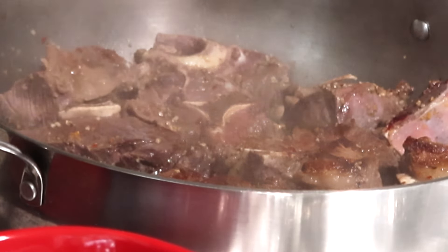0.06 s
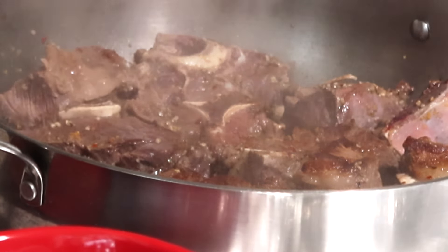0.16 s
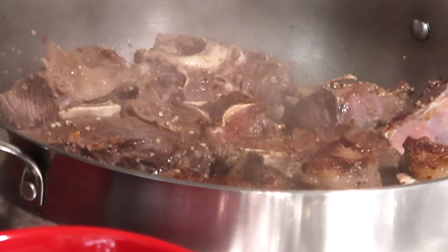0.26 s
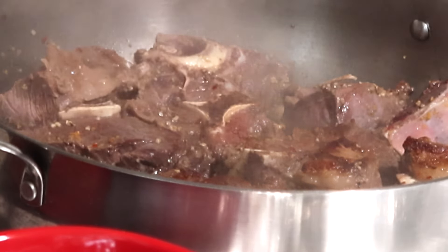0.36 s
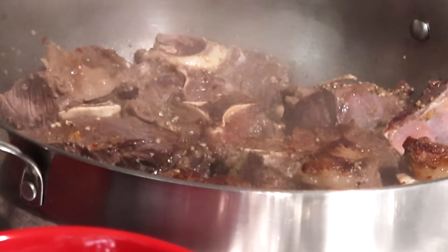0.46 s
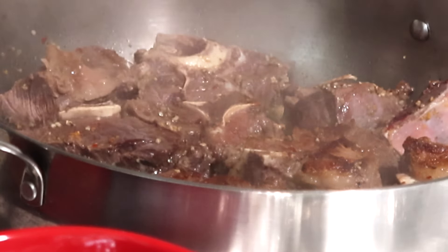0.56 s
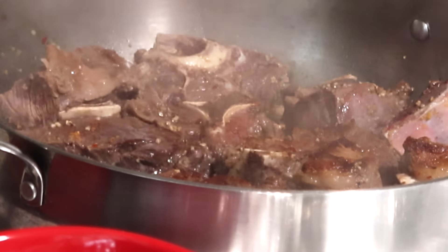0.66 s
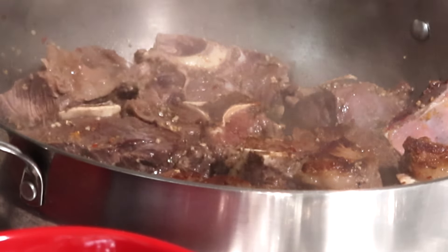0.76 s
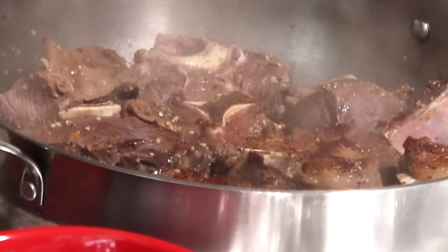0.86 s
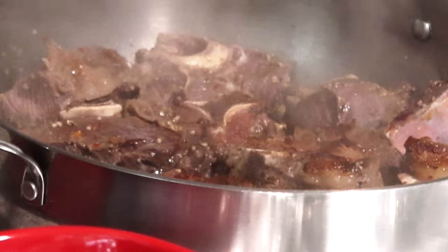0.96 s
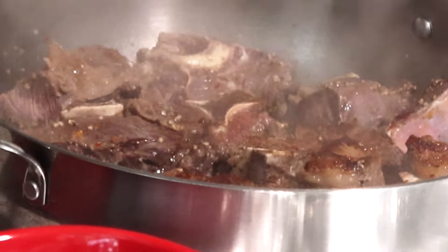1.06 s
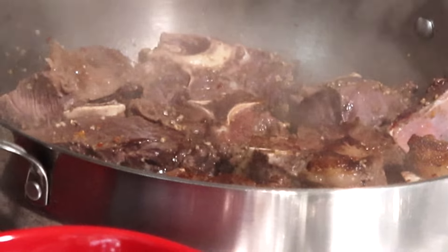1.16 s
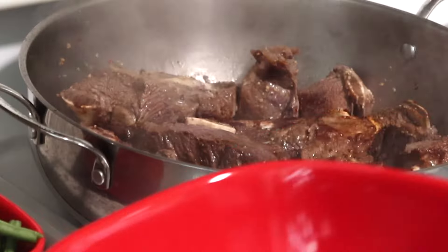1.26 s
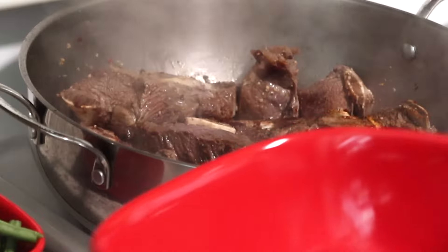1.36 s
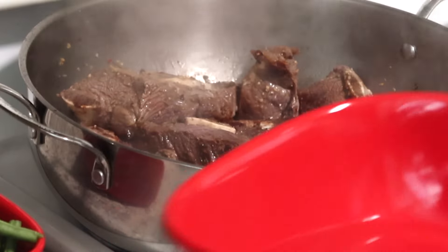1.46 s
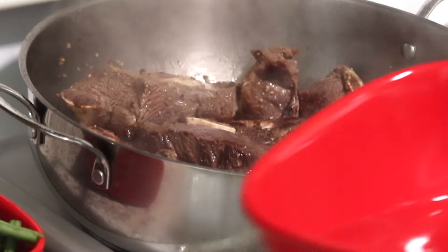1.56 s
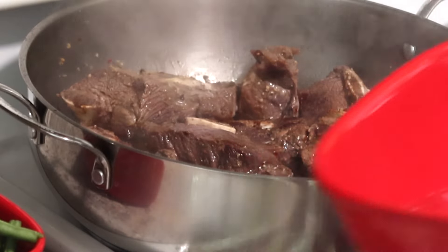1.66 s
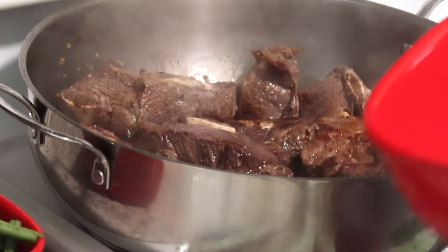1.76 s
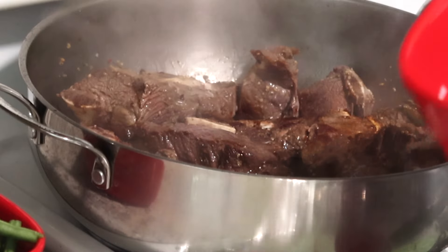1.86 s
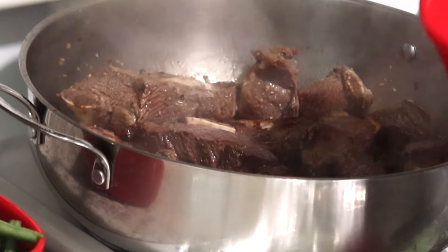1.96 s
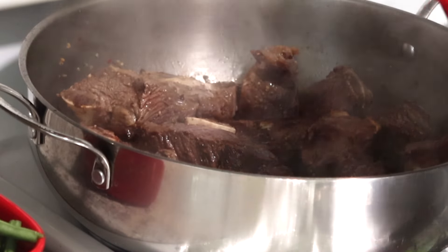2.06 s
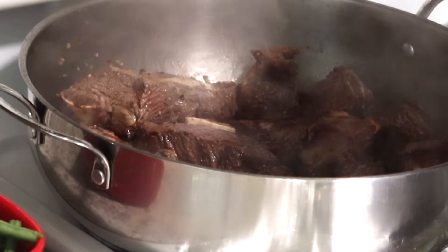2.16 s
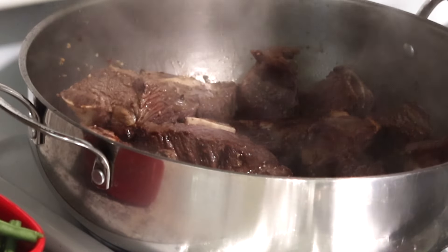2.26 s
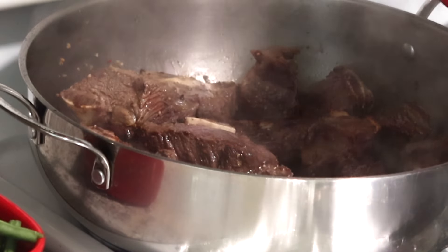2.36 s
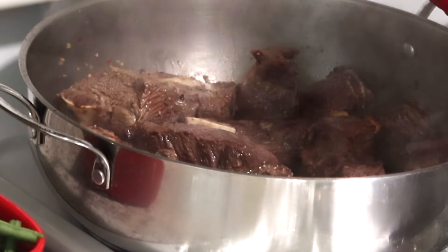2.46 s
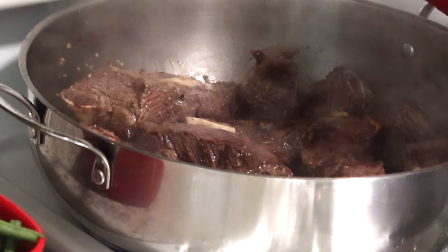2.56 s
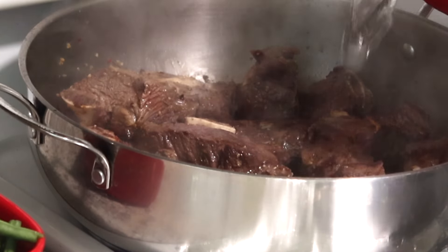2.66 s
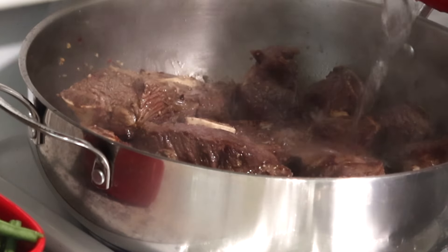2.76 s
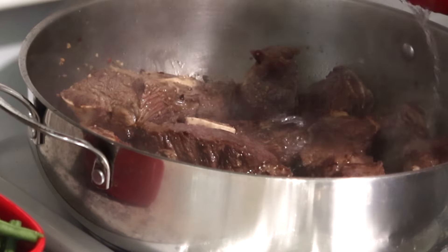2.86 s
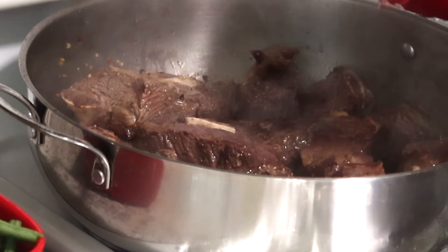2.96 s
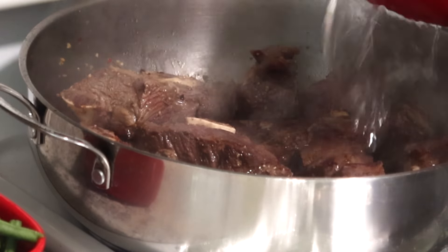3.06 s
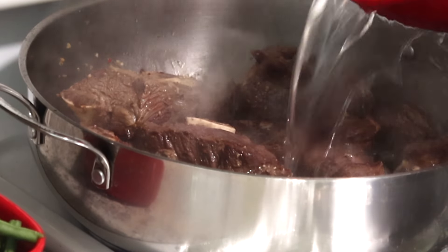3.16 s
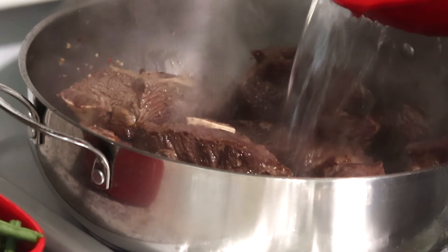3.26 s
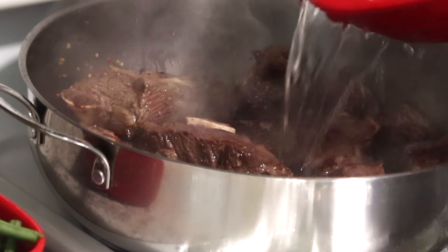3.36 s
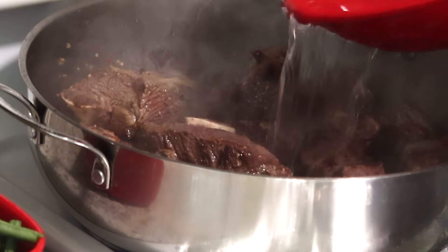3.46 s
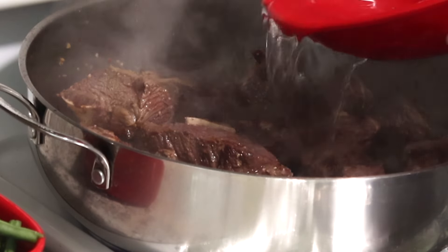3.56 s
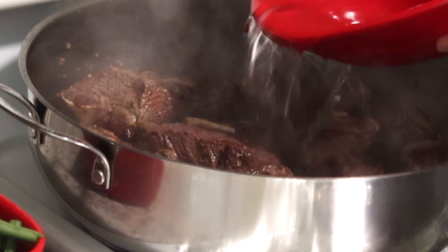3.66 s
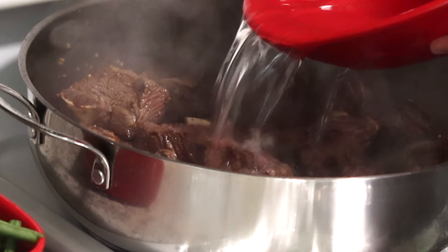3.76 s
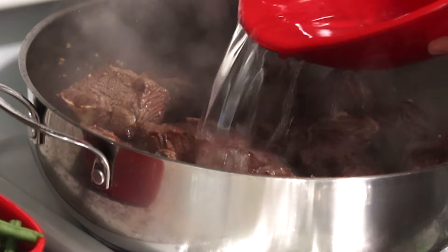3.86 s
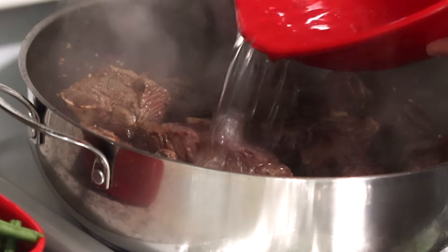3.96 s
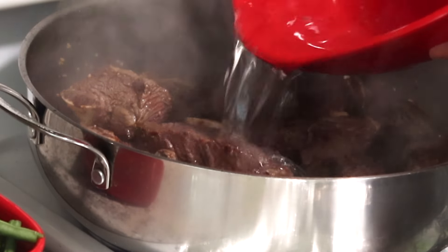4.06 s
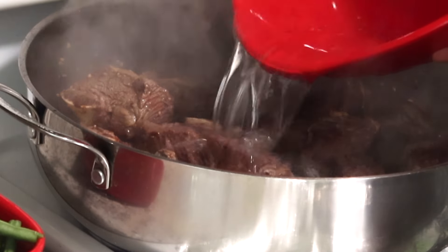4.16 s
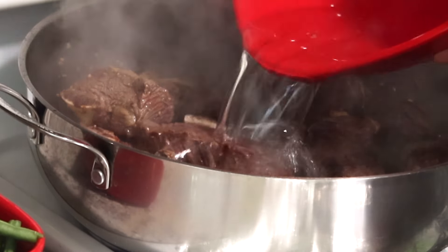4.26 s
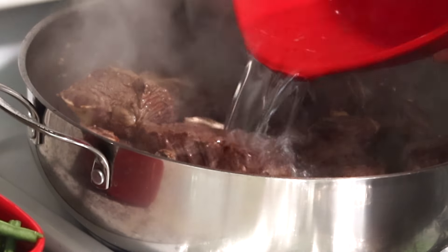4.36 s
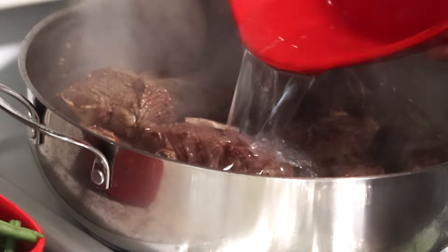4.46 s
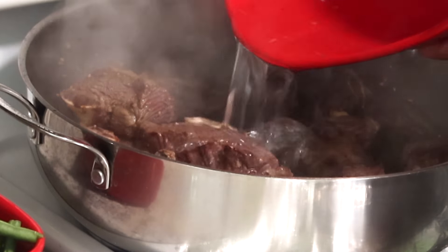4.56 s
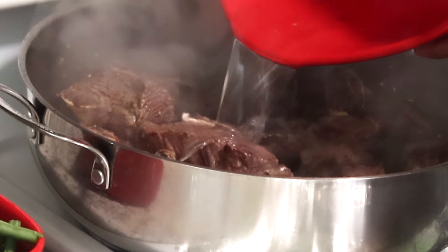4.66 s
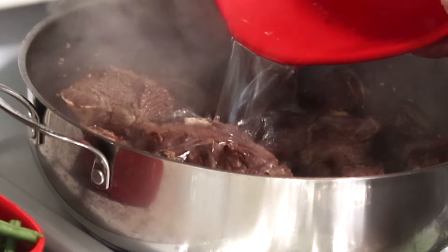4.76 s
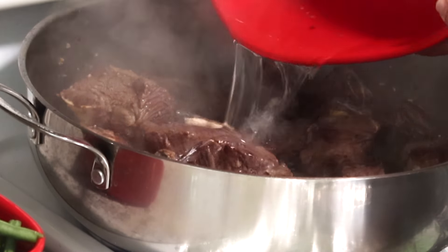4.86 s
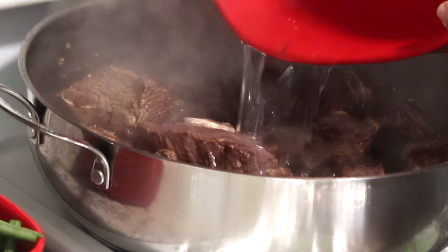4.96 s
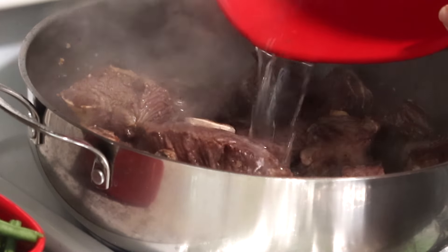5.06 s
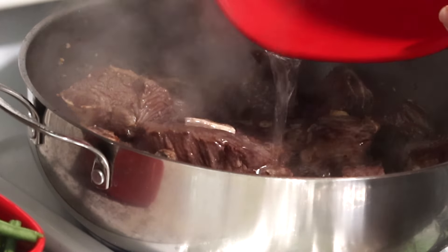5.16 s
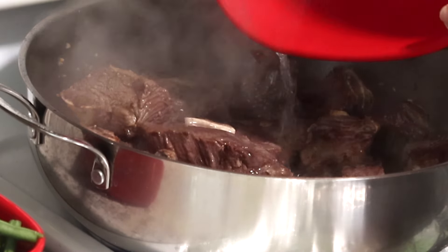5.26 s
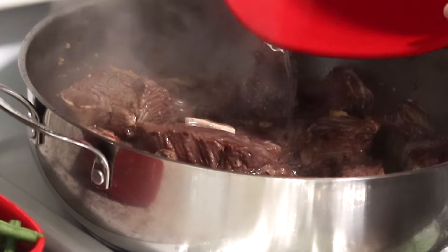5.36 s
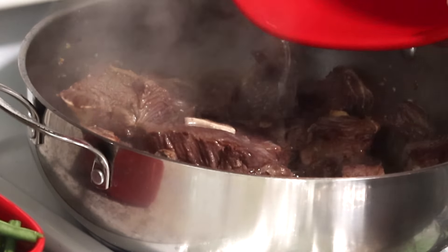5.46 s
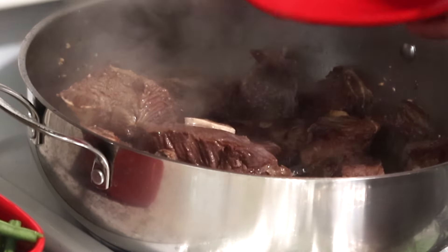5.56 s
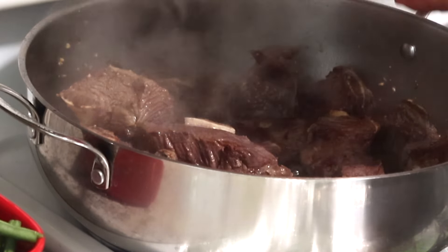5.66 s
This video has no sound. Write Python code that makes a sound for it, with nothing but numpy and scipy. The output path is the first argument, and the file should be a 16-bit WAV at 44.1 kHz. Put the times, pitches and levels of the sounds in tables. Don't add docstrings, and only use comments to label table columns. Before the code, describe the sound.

Close in a small kitchen, meat sizzles in a wide steel pan: a dense, fine crackle, gradually brightening, over the low hum and air rumble of an extractor fan. Soft low spits pop at about 0.3 and 0.8 s; from 0.9 s dull low bumps suggest the microphone being moved. At 1.17 s the sound drops out for under a tenth of a second, then returns abruptly with a louder, brighter fizz. From about 2.8 s water is poured in; steam hiss surges in the midrange, with a sharp loud spit at 3.5 s, growing to a rushing peak near 4.4 s. Gurgling builds beneath it as the pan fills, with a big plop around 4.6 s. After 4.8 s the fizz is quenched and dulls, the hiss falls away, and darker bubbling and small plops continue to the end, about 5.7 s. Faint metallic pan ring, short room tail, almost mono.

```python
import sys
import numpy as np
from scipy import signal
from scipy.io import wavfile
from scipy.ndimage import uniform_filter1d

SR = 44100
rng = np.random.default_rng(int(sys.argv[2]) if len(sys.argv) > 2 else 0)


def invert_db(level):
    return 10 ** (np.asarray(level, dtype=float) / 20)


def pcm_store(signal):
    levels = np.round(np.clip(np.atleast_2d(signal), -1, 1) * 32767)
    wavfile.write(sys.argv[1], SR, levels.astype(np.int16).T)


N = 251678
DROP_S, BACK_S = 1.1717, 1.2485


def unit(x):
    return x / np.sqrt(np.mean(x ** 2) + 1e-20)


def in_time(rows):
    s, *columns = np.transpose(rows)
    return [np.interp(np.arange(N) / SR, s, c) for c in columns]


def swell(t, s, length):
    return np.exp(-.5 * ((t - s) / length) ** 2)


def drift(rate):
    r = np.exp(-80 * np.pi * rate / SR)
    noise = rng.standard_normal(N // 40 + 2002)
    slow = signal.lfilter([1], [1, -2 * r, r * r], noise)[2000:]
    return np.interp(np.arange(N) / 40, np.arange(len(slow)), unit(slow))


def resonance(x, hz, width_hz):
    r = np.exp(-np.pi * width_hz / SR)
    poles = [1, -2 * r * np.cos(2 * np.pi * hz / SR), r * r]
    return signal.lfilter([(1 - r * r) / 2, 0, (r * r - 1) / 2], poles, x)


def bursts(colour, per_s, spread_db, surge_db, patch_db, tilt_db=0):
    hz, level_db = np.transpose(colour)
    edges = 2 ** np.arange(np.log2(hz[0]), np.log2(hz[-1]) + 1 / 5, 1 / 4)
    sizes = invert_db(spread_db * np.minimum(rng.exponential(1, N), 5)) * rng.choice([-1, 1], N)
    chance, surge = rng.random((3, N)), drift(14.6)
    out, power = 0, 0
    for k, (low, high) in enumerate(zip(edges, np.minimum(edges[1:], .45 * SR))):
        struck = np.roll(chance[k % 3], 1499 * k) < per_s / SR
        clicks = unit(np.roll(sizes, 997 * k) * struck)
        band = signal.butter(2, [low, high], "band", fs=SR, output="sos")
        rings = signal.sosfilt(band, clicks + 1e-18)
        centre = np.sqrt(low * high)
        gain_db = np.interp(np.log(centre), np.log(hz), level_db)
        power += invert_db(2 * gain_db) * np.mean(rings ** 2)
        slope_db = tilt_db * np.log2(centre / hz[np.argmax(level_db)])
        out = out + invert_db(gain_db + slope_db + surge_db * surge + patch_db * drift(11)) * rings
    return out / np.sqrt(power)


# (fizz level [dB], fizz tilt [dB/octave], flash level [dB], gurgle level [dB])
SIMMER = [
    (-30, -1, -30, -38),
    (-23.5, -0.7, -29.5, -40.5),
]


def simmer():
    early = np.arange(N) / SR < BACK_S
    return [np.where(early, before, after) for before, after in zip(*SIMMER)]


# (time [s], level [dB])
VIGOUR = [(0, -2.5), (.2, -1.5), (.4, 0.6), (.75, -0.4), (1.17, -1.5)]


def vigour():
    return (np.arange(N) / SR < BACK_S) * in_time(VIGOUR)[0]


# (time [s], level [dB])
POUR = [(1.4, 0), (2.75, 1.4), (3.0, 4.5), (3.45, 8), (3.8, 8.5), (4.35, 10.5), (4.7, 8.5), (5.05, 3),
        (5.7, -2)]


def pour():
    return (np.arange(N) / SR >= BACK_S) * in_time(POUR)[0]


def pool():
    from_s, full_s = 2.78, 4.5
    t = np.arange(N) / SR
    return np.clip((t - from_s) / (full_s - from_s), 0, 1), np.maximum(t - full_s, 0)


# (time [s], steam level [dB], gurgle level [dB], length [s])
SURGES = [(.33, .6, 3.5, 0.025), (2.99, 0.5, -1.5, 0.055), (3.045, -.6, 3.5, 0.039),
          (3.327, 0.5, -0.5, 0.027), (3.527, 2.5, 0, 0.027), (3.9, 1, 0, 0.11), (4.18, 1.3, 0.5, 0.062),
          (3.7, 0.8, 2, 0.1), (4.38, 1.5, -1, 0.05), (4.95, 1, 3, 0.066), (5.077, 0, -2, 0.04),
          (5.38, 2, 2.5, 0.026), (5.478, -9, 0.5, 0.026)]


def surges():
    t = np.arange(N) / SR
    steam_db = sum(db * swell(t, s, length) for s, db, _, length in SURGES)
    gurgle_db = sum(db * swell(t, s, length) for s, _, db, length in SURGES)
    return steam_db, gurgle_db


# (frequency [Hz], spectral density [dB])
FIZZ = [(700, -16.5), (1500, -13), (2800, -8.5), (4200, -1.5), (6500, -2.5), (9000, -5.5), (12000, -12.5),
        (15800, -20)]
# (time [s], level [dB], length [s])
FLARES = [(2.45, 0.5, 0.043), (3.152, 2, 0.071), (3.55, 1.5, 0.033), (3.657, -0.5, 0.053), (4.152, 1, .05),
          (4.637, 1.5, 0.044), (5.05, 3.5, .02), (5.098, -2, .02), (5.16, 1, .015), (5.234, -7, 0.011),
          (5.262, 1.5, 0.0175), (5.375, -1, .01), (5.455, 0, 0.011), (5.5, 0.5, 0.032),
          (5.567, -11, 0.0087), (5.595, 4, 0.016)]


def fizz():
    t = np.arange(N) / SR
    level_db, tilt, _, _ = simmer()
    pour_db = pour()
    drown_from_s, drown_time_constant_s = 4.794, 0.79
    drowned = 1 - np.exp(-np.maximum(t - drown_from_s, 0) / drown_time_constant_s)
    flare_db = sum(db * swell(t, s, length) for s, db, length in FLARES)
    level_db = level_db + vigour() + 0.25 * pour_db - 14 * drowned
    brightening = 0.82 * t * (t < BACK_S)
    tilt = tilt + brightening - 0.08 * pour_db - 8.5 * drowned
    return invert_db(level_db + 0.9 + 0.68 * flare_db) * bursts(FIZZ, 11000, 2.2, 0.56, 0.31, tilt + 0.22 * flare_db)


# (frequency [Hz], spectral density [dB])
FLASH = [(500, -20), (900, -12), (1300, -7), (1650, 0.5), (2150, 3), (2600, 0.5), (3200, -1), (5000, -8.5),
         (8000, -13.5)]


def flash():
    _, _, level_db, _ = simmer()
    level_db = level_db + 0.72 * vigour() + pour() + surges()[0]
    return invert_db(level_db - 0.5) * bursts(FLASH, 4000, 2.32, 0.067, 0.96)


# (frequency [Hz], spectral density [dB])
GURGLE = [(200, -10.5), (330, -4), (480, 0.5), (750, 3), (1000, 3), (1300, 3), (1800, -8), (3000, -16)]


def gurgle():
    _, _, _, level_db = simmer()
    depth, flooded_s = pool()
    level_db = level_db + 0.97 * vigour() + 13.5 * depth - 4 * flooded_s + surges()[1]
    tilt = -.3 - 4 * flooded_s
    return invert_db(level_db - 1.5) * bursts(GURGLE, 900, 2.2, 0.29, 0.17, tilt)


# (frequency [Hz], width [Hz], added level [dB])
BODY = [(367, 7.5, -16), (492, 40, 3), (634, 16, -0.5), (702, 46, -2), (796, 44, -4.5), (909, 29, -3.5),
        (1004, 58, -12), (1240, 170, -8.5), (1360, 28, -0.5), (1555, 110, -5), (2020, 48, -15),
        (2200, 105, -14.5), (2934, 68, -10), (3470, 99, -18), (4030, 280, -15.5), (6000, 52, -34.5)]


def steel(x):
    return invert_db(-1.5) * (x + sum(invert_db(db) * resonance(x, hz, width) for hz, width, db in BODY))


# (frequency [Hz], spectral density [dB])
RUMBLE = [(25, -9), (40, -3.5), (60, -18.5), (80, -0.5), (110, -2), (150, -4), (220, -10), (320, -10),
          (450, -13), (800, -29)]
# (frequency [Hz], early level [dB], late level [dB])
MOTOR = [(59, -56, -49.5), (119.7, -44.5, -45), (175, -69, -60), (303.3, -53.5, -58.5)]


def fan():
    t = np.arange(N) / SR
    turn, tones = 2 * np.pi * t + .003 * drift(3), 0
    for hz, early_db, late_db in MOTOR:
        level_db = np.where(t < BACK_S, early_db, late_db) + 3 + 1.1 * drift(9)
        tones = tones + invert_db(level_db) * np.sin(hz * turn)
    air = bursts(RUMBLE, 9000, 1.0, 0.25, 0.23)
    air_db = -40.5 + 2 * pool()[0] - 2.5
    return invert_db(air_db) * (air + invert_db(-6.0) * resonance(air, 99, 12.4)) + tones


def kitchen(x):
    t60_s = 0.24
    t = np.arange(round(.4 * SR)) / SR
    echoes = rng.standard_normal(len(t)) * invert_db(-60 * t / t60_s) * (t > .004)
    echoes = signal.lfilter([1], [1, -.3], echoes)
    return signal.fftconvolve(x, echoes / np.sqrt(np.sum(echoes ** 2)))[:N]


# (time [s], peak level [dB], pitch [Hz])
SPITS = [
    (0.2126, -18, 2020),
    (0.329, -14, 990),
    (0.782, -19, 1700),
    (0.803, -18, 960),
    (3.523, -6, 2300),
    (3.538, -15, 2300),
    (4.952, -23, 900),
    (4.982, -18, 1200),
    (5.379, -15, 1000),
]


def spits():
    out, t = np.zeros(N), np.arange(round(.15 * SR)) / SR
    sprays = rng.standard_normal((len(SPITS), len(t)))
    for (s, peak_db, hz), spray in zip(SPITS, sprays):
        puff = invert_db(-30) * spray * np.exp(-t / 0.027)
        puff[0] += 1
        ring = resonance(resonance(puff, hz, 1.1 * hz), hz, 3.4 * hz)
        at = round(s * SR)
        out[at:at + len(t)] += invert_db(peak_db + 23.0) * ring
    return out


def handling():
    from_s, rise_s, level_db = .86, .06, -42
    t = np.arange(N) / SR
    band = signal.butter(2, [40, 130], "band", fs=SR, output="sos")
    thud = signal.sosfilt(band, rng.standard_normal(N))
    return invert_db(level_db) * np.clip((t - from_s) / rise_s, 0, 1) * (t < BACK_S) * unit(thud)


# (time [s], peak level [dB], pitch [Hz], life [s])
PLOPS = [(4.565, -11, 1152, 0.018), (4.74, -15, 613, 0.0079), (4.948, -19, 510, 0.013),
         (4.978, -30, 680, 0.011), (5.268, -24, 690, 0.011), (5.278, -25, 504, 0.016),
         (5.315, -25, 435, 0.013), (5.372, -21, 772, 0.01), (5.45, -19, 592, 0.011),
         (5.538, -20.5, 490, 0.013), (5.62, -19, 573, 0.022)]


def plops():
    out, t = np.zeros(N + SR), np.arange(round(.08 * SR)) / SR
    for s, peak_db, hz, life in PLOPS:
        shape = t / life * np.exp(1 - t / life * 2.5)
        at = round(s * SR)
        out[at:at + len(t)] += invert_db(peak_db - 1.5) * shape * np.sin(2 * np.pi * hz * t * (1 + 1.15 * t))
    return out[:N]


def scene():
    pan = steel(fizz() + flash() + gurgle() + spits() + plops())
    return np.tile(pan + invert_db(-14) * kitchen(pan) + fan() + handling(), (2, 1))


# (time [s], low edge [Hz], high edge [Hz])
FILLS = [(0.118, 4620, 5770), (0.258, 6240, 8350), (0.258, 8870, 10340), (0.304, 7620, 9100),
         (0.351, 8230, 9690), (0.722, 4610, 5770), (0.722, 7540, 8960), (0.885, 5130, 6370),
         (0.908, 5170, 7600), (0.954, 5700, 6980), (1.512, 8910, 10420), (2.046, 10940, 12490),
         (2.069, 8350, 10420), (2.092, 6300, 7670), (2.139, 4610, 5730), (2.255, 5160, 6300),
         (2.44, 4640, 5600), (2.649, 5210, 6300), (2.905, 10900, 12400), (2.928, 5170, 6980),
         (3.021, 4610, 6290), (3.021, 7580, 9000), (3.625, 4260, 6800), (4.019, 8200, 10420),
         (4.112, 4240, 5150), (4.112, 8230, 9730), (4.205, 8300, 9690), (4.878, 8910, 10380),
         (4.971, 4220, 5200), (5.064, 4650, 5700)]


def fill_bands(mid):
    top_hz, offset = 15750, 100
    n, side, mid = np.arange(2048), np.zeros(N), mid.copy()
    bell = np.sin(np.pi * (n + .5) / len(n))
    # time [s], low edge [Hz], width [Hz]
    stray = rng.uniform((.1, 10300, 1400), (4.5, 14400, 2600), size=(10, 3))
    fills = FILLS + [(s, low, min(low + width, top_hz)) for s, low, width in stray if abs(s - BACK_S) > .1]
    for (s, low, high), noise in zip(fills, rng.standard_normal((len(fills), 1024))):
        at = offset + 1024 * round((s * SR - offset) / 1024 - 1) + n
        k = np.arange(round(low / SR * 2048), round(high / SR * 2048))
        waves = bell * np.cos(np.pi / 1024 * np.outer(k + .5, n + 512.5)) / np.sqrt(512)
        held = waves @ mid[at]
        side[at] += np.sqrt(uniform_filter1d(held ** 2, size=40) / 2) * noise[k] @ waves
        mid[at] -= (1 - np.sqrt(.5)) * held @ waves
    return np.array([mid + side, mid - side])


def low_pass(x):
    return signal.sosfilt(signal.butter(12, 15750, fs=SR, output="sos"), x)


def record(dry):
    t = np.arange(N) / SR
    cut = np.clip((DROP_S - t) / .0012, 0, 1)
    smear = invert_db(-23 - 2800 * np.clip(t - DROP_S, 0, 1)) * (t < DROP_S + .015)
    back = np.clip((t - BACK_S) / 0.012, 0, 1) ** 0.99
    rounded = .9 * np.tanh(dry[0] / .9)
    top = signal.cheby2(18, 60, 16350, fs=SR, output="sos")
    mid = signal.sosfilt(top, (np.maximum(cut, smear) + back) * rounded)
    return low_pass(fill_bands(mid))


dry = scene()
out = record(dry)
pcm_store(out)
```